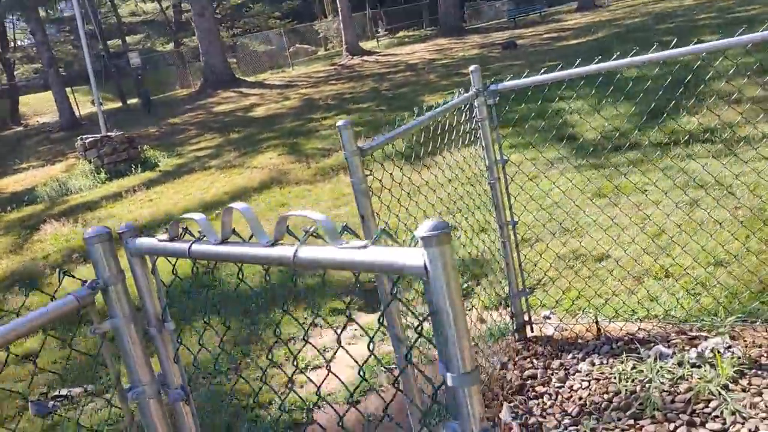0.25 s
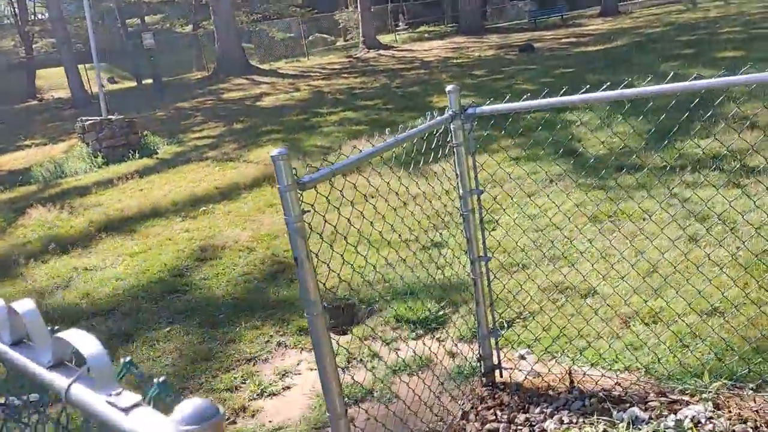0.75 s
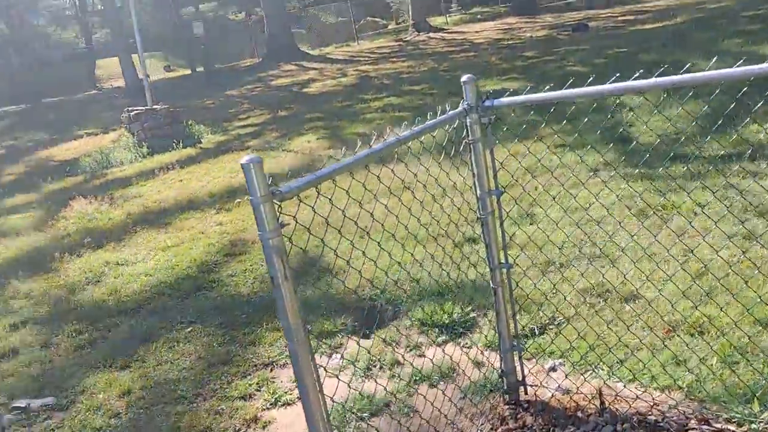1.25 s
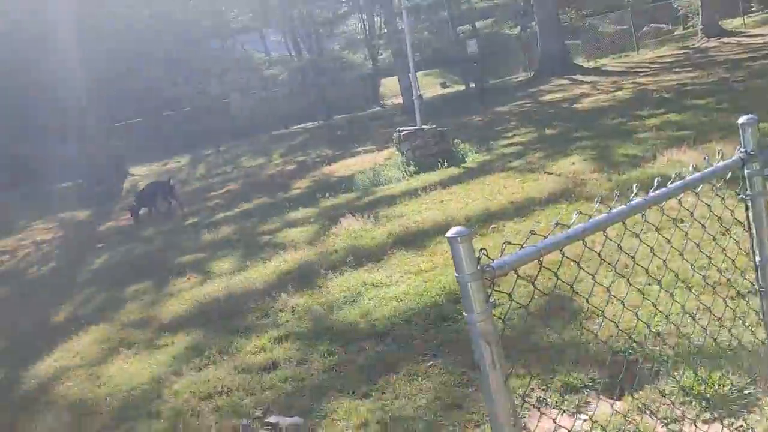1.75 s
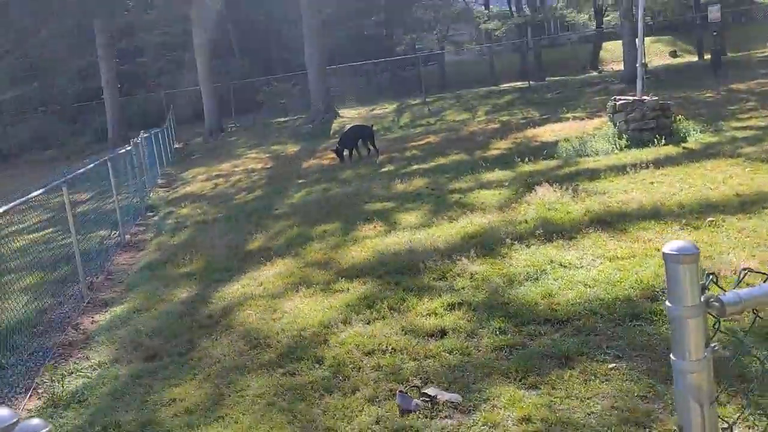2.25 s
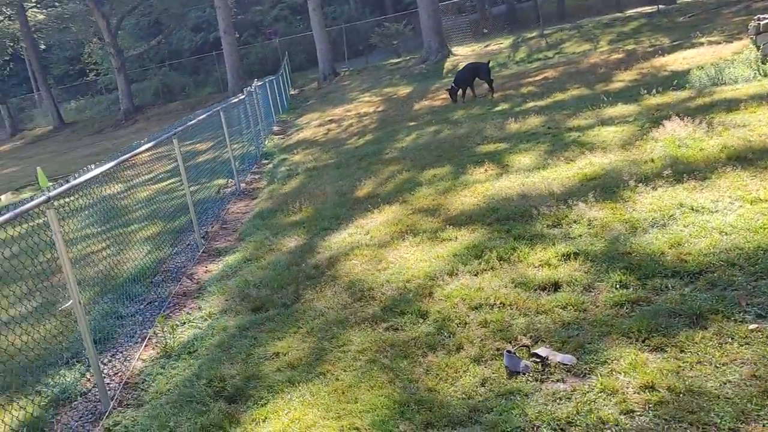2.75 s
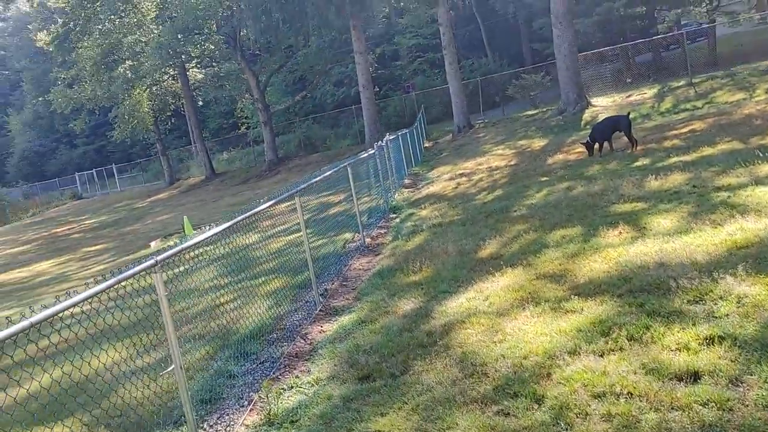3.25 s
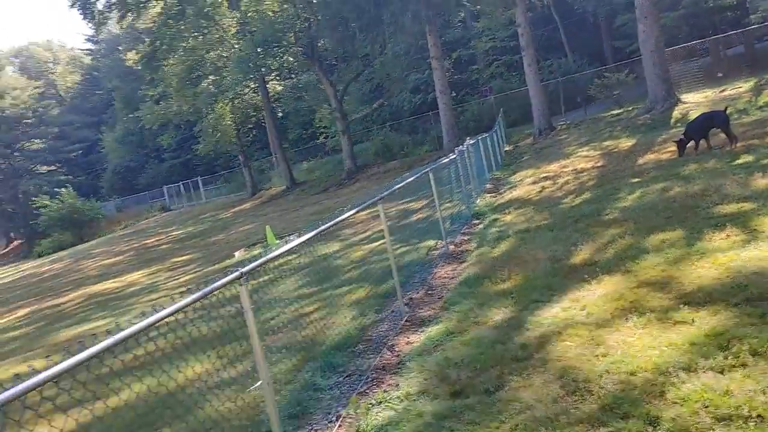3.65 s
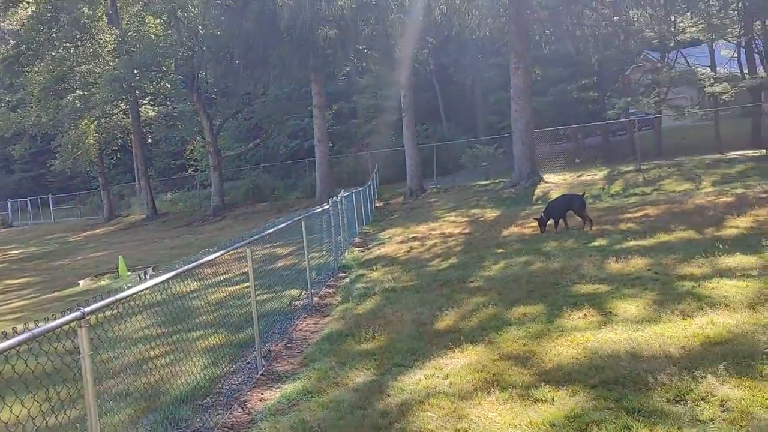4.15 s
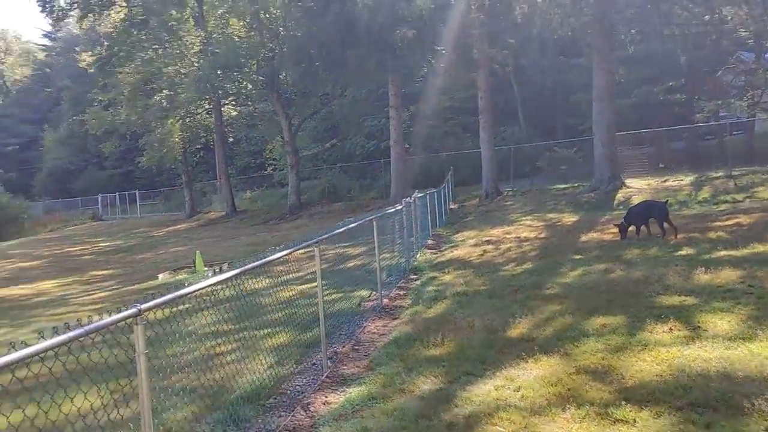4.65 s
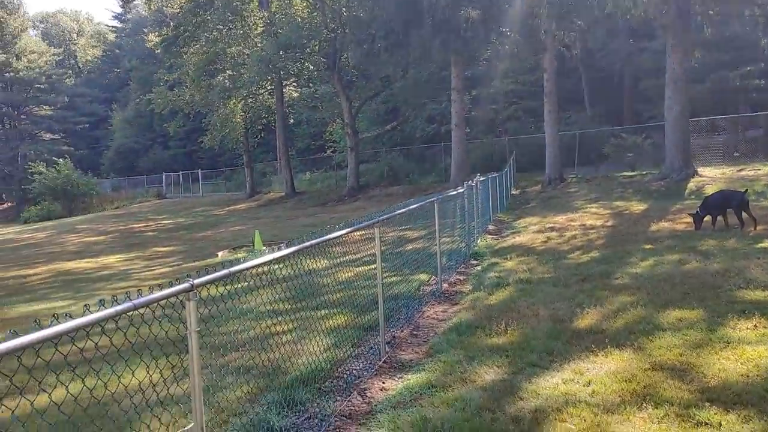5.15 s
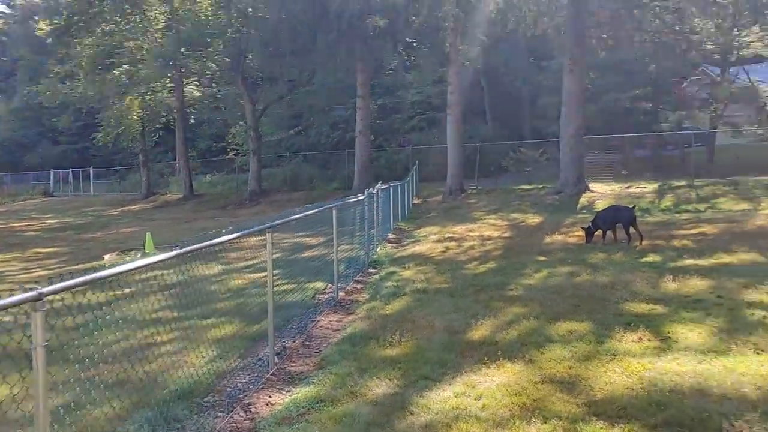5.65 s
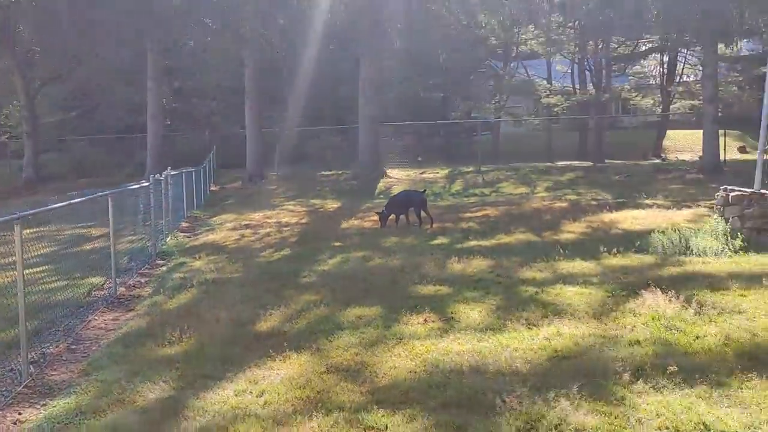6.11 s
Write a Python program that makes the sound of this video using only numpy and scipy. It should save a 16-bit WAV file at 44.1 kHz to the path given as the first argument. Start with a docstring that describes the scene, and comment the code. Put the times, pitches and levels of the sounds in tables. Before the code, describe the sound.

A chain-link gate slams onto its metal post with a ringing clank, then its latch clinks and rattles in a quiet yard.

```python
"""A chain-link gate is swung shut in a quiet back yard: its tube frame clanks on the post and rings, then
the steel fork latch is lifted, dropped and rattled home. Each blow is short coloured noise; frame and fork
add decaying sine modes. The hinge squeaks in wavering sines, loose mesh ticks and chatters in grainy noise,
and feet thud and brush through the grass. Shaped noise makes the rumble and hiss of distant woods, and
late on puffs of wind touch the microphone."""
import sys
import numpy as np
from scipy import signal
from scipy.fft import rfft, irfft, next_fast_len
from scipy.io import wavfile
from scipy.ndimage import uniform_filter1d, map_coordinates

SR = 44100
rng = np.random.default_rng(int(sys.argv[2]) if len(sys.argv) > 2 else 0)


def transcribe(signal):
    """Save signal, clipped to [-1, 1], as a 16-bit WAV file at the path in sys.argv[1]."""
    frames = np.atleast_2d(signal).T
    limited = np.clip(frames, -1, 1)
    pcm = np.round(limited * 32767).astype(np.int16)
    wavfile.write(sys.argv[1], SR, pcm)


N = 281345  # length in samples

# Edges of the four bands of a blow, knock, clank, clink and tick: f/Hz
BAND_EDGES = [250, 900, 3500, 9000, 16000]
LEAD = .02  # time kept before each blow for the noise swell around it (s)


def gate():
    """The tube frame knocks on the post: each contact is a noisy clash plus the long modes of the tubes."""
    # Frame against post: t/s, clank level/dB before trims, hardness (tick over clank)/dB, t60/s, left-right/dB
    gate_hits = [(2.083, -33, -27.5, .06, 0), (2.157, -34, -16.5, 0.14, 1.5),
                 (2.217, -19.5, -14.5, 0.051, 2), (2.251, -21, -16, 0.16, -5.5), (2.261, -10, 0, 0.046, 0),
                 (2.2655, -29, 12.5, 0.18, 9), (2.353, -16.5, -9.5, .076, 2), (2.362, -27.5, -4, 0.048, 14),
                 (2.409, -20.5, -43, 0.06, -6), (2.439, -29, -45, 0.1, 5.5)]
    # Frame tubes: f/Hz, relative level/dB, t60/s
    tube_modes = [(840, -14, 1.0), (894, -18, .8), (1308, -21, .2), (1485, -20, .25), (1600, -17, .28),
                  (1776, -21, .22), (1949, -18, .72), (1992, -13, .33), (2492, -16, .25), (2681, -13, .21),
                  (2935, -18, .2), (3044, -16, .18), (3703, -16, .17), (3930, -20, .42), (4988, -17, .24),
                  (6428, -12, .15), (8820, -3, .09), (10645, -18, .2), (11061, -18, .2), (11209, -15, .3),
                  (13400, -19, .15), (14800, -27, .26)]
    out = np.zeros((2, N))
    for s, db, hardness_db, t60, left_db in gate_hits:
        levels_db = contact(db, hardness_db, thump_db=-18)
        add(out, s - LEAD, amp(-3.5) * panned(left_db) * clash(levels_db, t60))
        add(out, s, amp(-4) * panned(left_db) * ring(tube_modes, levels_db))
    return out


def latch():
    """The steel fork clashes and rings; the balance of its modes depends on where it is struck."""
    # Fork blows: t/s, clank level/dB before trims, hardness (tick over clank)/dB, knock over clank/dB,
    # t60/s, left-right/dB, striking point (0 tip - 1 heel)
    fork_hits = [(2.899, -29.5, -48, -11.5, .06, -3, .05), (3.064, -33, -18.5, -31, .05, 4.5, .05),
                 (3.092, -38.5, 20.5, -25.5, .07, 4, .15), (3.245, -31.5, -17.5, -11.5, 0.13, 1.5, .5),
                 (3.283, -32, -17, 9, .065, -0.5, 0), (3.316, -17.5, 3, -13.5, 0.077, 1, 1),
                 (3.863, -28.5, -25.5, -33.5, .05, -0.5, .12), (3.973, -27.5, -8.5, -12, .05, -3, .4),
                 (4.04, -43, 1.5, -25, .09, -0.5, .18), (4.052, -37.5, -1, -37, .08, 5.5, .3),
                 (4.0707, -31, 16, -31.5, .07, -1, .05), (4.085, -26.5, 9, -34.5, .055, -3.5, .15)]
    # Fork: f/Hz, relative level struck at the tip/dB, relative level struck at the heel/dB, t60/s
    fork_tones = [(620, -20, -1, .08), (1529, -15, -32, .3), (1740, -20, -22, .45), (1860, -24, -19, .38),
                  (1980, -20, -13, .24), (2400, -20, -4, .07), (2990, -14, -2, .07), (3560, -14, -22, .19),
                  (3930, -10, -12, .07), (5730, -22, -10, .1), (6290, -20, -9, .08), (8333, -41, -23, .5),
                  (10030, -8, -26, .14), (10150, -21, -40, .27), (11460, -30, -32, .3),
                  (11397, -15, -12, .08), (13280, -11, -15, .07)]
    out = np.zeros((2, N))
    for s, db, hardness_db, thump_db, t60, left_db, heel in fork_hits:
        levels_db = contact(db, hardness_db, thump_db)
        modes = []
        for hz, tip_db, heel_db, life in fork_tones:
            modes.append((hz, np.interp(heel, [0, 1], [tip_db, heel_db]), life))
        add(out, s - LEAD, panned(left_db) * clash(levels_db, t60))
        add(out, s, amp(-0.5) * panned(left_db) * ring(modes, levels_db))
    return out


def contact(db, hardness_db, thump_db):
    """Levels of knock, clank, clink and tick: a harder contact excites more treble, a cushioned one is dull."""
    clink_db = -1 + 0.48 * hardness_db  # the clink takes about half of the hardness
    return db + np.array([thump_db, 0, clink_db, hardness_db])


def clash(levels_db, t60, attack=0.00099, swell_db=-22, uneven_db=4, spacing_hz=110):
    """Steel on steel: uneven noise dies like crowded short modes; a faint swell lies just before and around."""
    # Colour of the crowded short modes: f/Hz, relative level/dB
    steel_colour = [(250, -9.5), (340, 0), (600, 1), (760, -3.5), (950, -6), (1500, 5.5), (2000, 9.5),
                    (3000, 1), (4600, -11), (6600, -6.5), (7700, -13.5), (9400, -11), (11400, -4.5),
                    (13300, -8.5), (15700, -10)]
    crack_db, crack_s = -8, .002  # the first instant stands out over the decay
    swell_s = 0.0077  # time constant of the noise swell on either side of the blow
    t = np.arange(SR // 6) / SR - LEAD
    strengths = rng.standard_normal(size=400)

    def uneven(hz):
        bumps = np.interp(hz / spacing_hz, np.arange(len(strengths)), strengths)
        return amp(uneven_db * (hz > BAND_EDGES[1]) * bumps)  # the knock band stays even

    crowd = filtered(rush(steel_colour, size=len(t), lag=0.00021), uneven)

    def band(lo, hi):
        return unit(filtered(crowd, lambda hz: 1 / (1 + (lo / (hz + 1)) ** 10) / (1 + (hz / hi) ** 20)))

    body = sum(amp(db) * band(lo, hi) for db, lo, hi in zip(levels_db, BAND_EDGES, BAND_EDGES[1:]))
    after = np.maximum(t, 0)
    blow = np.exp(-np.log(1000) * after / t60) * (1 - np.exp(-after / attack))
    blow = blow * (1 + amp(crack_db) * np.exp(-after / crack_s))
    swell = amp(swell_db) * np.exp(-np.abs(t) / swell_s)
    return body * (blow + swell)


def ring(modes, levels_db):
    """Long sine modes, each driven by the blow in its band; strength and phase differ at each port."""
    size = SR // 2  # time given to each blow to die away
    out = np.zeros((2, size))
    for hz, db, t60 in modes:
        t = np.arange(min(size, int(t60 * SR))) / SR
        drive_db = levels_db[np.searchsorted(BAND_EDGES[1:-1], hz)] + 2 * rng.standard_normal((2, 1))
        phase = rng.uniform(0, 2 * np.pi, (2, 1))
        decay = np.exp(-np.log(1000) * t / t60)
        out[:, :len(t)] += amp(db + drive_db) * decay * np.sin(2 * np.pi * hz * t + phase)
    onset = 1 - np.exp(-np.arange(size) / SR / 0.00043)
    return out * onset


def swing():
    """The hinge squeaks in wavering sines; the shaken mesh chatters as grainy noise and settles to rest."""
    # Hinge squeak: f/Hz, relative level/dB
    squeak_tones = [(2492, -1), (2680, -13), (4985, -8), (11055, -11)]
    # Colour of the shaken mesh: f/Hz, relative level/dB
    shaken_colour = [(250, -23), (650, 0), (1000, -16.5), (1700, 4.5), (2800, 1), (4600, -7), (6700, -3.5),
                     (7800, -15), (9500, -21.5), (11300, -8.5), (13500, -19), (15700, -24)]
    slide_s, slam_s, rest_s = 2.07, 2.261, 2.45  # frame meets post, slams, comes to rest
    t = np.arange(N) / SR
    tones = 0
    for hz, db in squeak_tones:
        strength = amp(db + 2 * wobble(37))
        phase = rng.uniform(0, 2 * np.pi, (2, 1)) + .8 * wobble(60)
        tones = tones + strength * np.sin(2 * np.pi * hz * t + phase)
    chatter = crowded(grainy(shaken_colour, rate=220, depth_db=5), depth_db=6, spacing_hz=70)
    squeak = stroke(2.145, .115, -41.5, attack=0.029, release=.008)
    slide = stroke(slide_s, slam_s - slide_s, -48, attack=0.036, release=.015)
    settling_db = -24 - 80.5 * np.maximum(t - slam_s, 0)  # falls 80.5 dB a second
    slam = stroke(slam_s, rest_s - slam_s, settling_db, attack=.008, release=0.0061)
    return squeak * tones + amp(-1) * (slide + slam) * chatter


def crowded(x, depth_db, spacing_hz):
    """Many narrow wire resonances: random peaks and dips across the spectrum."""
    strengths = rng.standard_normal(size=2000)

    def peaks(hz):
        return amp(depth_db * np.interp(hz / spacing_hz, np.arange(len(strengths)), strengths))

    return unit(filtered(x, peaks))


def mesh():
    """Loose wire and fittings tick without long modes; the longer ticks also start more softly."""
    # Rattles: t/s, clank level/dB before trim, hardness (tick over clank)/dB, t60/s, left-right/dB
    mesh_hits = [(.377, -45, -20, 0.071, -7), (0.771, -50.5, 0.5, .034, -9), (0.805, -61.5, 18, 0.031, -16),
                 (1.2, -43, -23, 0.11, 4), (1.253, -42.5, -9.5, 0.14, 3.5), (1.293, -38, -42, 0.038, 9),
                 (1.304, -40, -43, 0.035, -10), (1.372, -59.5, 14.5, 0.095, -8),
                 (1.508, -36, 0.5, 0.014, 4), (1.549, -43, -16, 0.022, -8),
                 (1.607, -29.5, -38, 0.016, -1.5), (1.645, -38.5, 3.5, 0.026, 11),
                 (3.041, -38, -29, 0.12, -4), (3.554, -42, -4, .06, -4), (3.692, -58, 20, .034, 2.5),
                 (3.723, -56.5, 12, 0.1, -7), (3.985, -34.5, -19, 0.07, -2.5), (4.591, -65, 23.5, .023, -4),
                 (4.723, -58.5, 14, 0.14, 4), (4.823, -48.5, -10.5, 0.055, 6.5),
                 (5.54, -47, -16, 0.067, -17), (5.752, -45.5, -15, 0.19, -4.5)]
    strays = stray_ticks(count=10, db=-50.5, spread_db=2.5, hardness_db=-5.5, t60=.03)
    out = np.zeros((2, N))
    for s, db, hardness_db, t60, left_db in mesh_hits + strays:
        levels_db = contact(db, hardness_db, thump_db=-10)
        add(out, s - LEAD, amp(-1.5) * panned(left_db) * clash(levels_db, t60, attack=t60 / 45))
    return out


def stray_ticks(count, db, spread_db, hardness_db, t60):
    """Rows of faint rattles scattered at random over the whole scene."""
    times = rng.uniform(LEAD, N / SR, count)
    chance = rng.standard_normal((count, 3))
    rows = []
    for s, (a, b, c) in zip(times, chance):
        rows.append((s, db + spread_db * a, hardness_db + spread_db * b, t60, spread_db * c))
    return rows


def rustle():
    """Friction as grainy noise: wire rubs on the frame, the hollow rail is scuffed, feet brush the grass."""
    # Wire rubbing on the frame: t/s, length/s, level/dB before trim
    wire_rubs = [(0.316, 0.11, -62.5), (1.213, 0.38, -66.5), (1.503, .008, -46), (1.545, .12, -55.5),
                 (2.836, 0.12, -60), (3.36, 0.24, -63)]
    # Colour of the rubbed wire: f/Hz, relative level/dB
    wire_colour = [(530, -35.5), (900, -10.5), (1010, -20), (1390, -3), (2840, -4.5), (4330, -1.5),
                   (7540, -14), (9230, -31), (10000, -17), (13000, -43), (22000, -120)]
    # Dull scuffs along the hollow rail: t/s, length/s, level/dB before trim
    rail_scuffs = [(1.247, .018, -45), (1.441, 0.022, -39), (1.894, 0.01, -46), (2.095, .02, -44.5),
                   (3.531, 0.026, -47.5), (4.991, .014, -42), (5.18, .008, -53), (5.364, .008, -51)]
    # Colour of the rail: f/Hz, relative level/dB
    rail_colour = [(300, -21), (1000, -15), (1400, -0.5), (1900, -0.5), (2500, -19), (4000, -31),
                   (8000, -47)]
    # Feet brushing the grass: t/s, length/s, level/dB before trim
    grass_brushes = [(1.227, 0.17, -60), (1.555, 0.022, -52.5), (2.842, .14, -59), (3.541, 0.027, -50.5),
                     (3.685, 0.069, -53.5), (4.523, 0.012, -60), (4.664, 0.032, -47), (4.965, .035, -61.5),
                     (5.739, 0.028, -48)]
    # Colour of the grass: f/Hz, relative level/dB
    grass_colour = [(2940, -42), (5000, -12), (6050, -23.5), (6760, -1.5), (10300, -9.5), (12000, 2.5),
                    (14200, -2), (16000, -27)]
    rubs = sum(stroke(*row, attack=0.0081, release=0.016) for row in wire_rubs)
    scuffs = sum(stroke(*row, attack=0.0049, release=0.016) for row in rail_scuffs)
    brushes = sum(stroke(*row, attack=0.007, release=0.035) for row in grass_brushes)
    wire = amp(3.5) * rubs * grainy(wire_colour, rate=200, depth_db=5.5)
    rail = amp(-1.5) * scuffs * grainy(rail_colour, rate=260, depth_db=2.5) * panned(-4.5)
    grass = amp(-0.5) * brushes * grainy(grass_colour, rate=350, depth_db=5.5)
    return wire + rail + grass


def steps():
    """Soft footfalls on turf: dull noise thuds with a quick start and decay."""
    # Footfalls: t/s, level/dB before trim
    footfalls = [(0.375, -39), (0.42, -44.5), (1.182, -37), (1.2, -38), (1.228, -38), (1.488, -40.5),
                 (2.001, -43), (2.127, -40), (2.852, -41), (2.875, -41.5), (3.579, -40), (4.53, -39),
                 (5.095, -41.5), (5.184, -46), (5.369, -44.5)]
    # Colour of a thud: f/Hz, relative level/dB
    thud_colour = [(71, -41), (120, -15.5), (437, 6), (955, -15), (1230, -14), (1750, -7.5), (2350, -49.5),
                   (3000, -14), (3900, -72), (6600, -120)]
    out, t = np.zeros((2, N)), np.arange(SR // 4) / SR
    thud = np.exp(-t / 0.016) * (1 - np.exp(-t / 0.00042))
    for s, db in footfalls:
        add(out, s, amp(db + 0.5) * thud * rush(thud_colour, size=len(t)))
    return out


def wind():
    """Puffs of fluttering low noise, mostly on the right port, which lags the left by 15 ms."""
    # Puffs: t/s, length/s, level/dB before trim
    puff_rows = [(4.92, .02, -50.5), (5.512, 0.057, -46.5), (5.652, .02, -49), (5.73, 0.065, -44),
                 (5.811, .21, -39.5), (6.333, 0.034, -48)]
    # Colour of the buffeting: f/Hz, relative level/dB
    buffet_colour = [(12, -42.5), (20, -7), (49, 3), (103, 2), (163, -5), (214, -34.5), (350, -29.5),
                     (460, -58), (770, -120)]
    flutter = amp(3.5 * wobble(40))
    lumps = rush(buffet_colour, lag=0.015) * flutter
    puffs = sum(stroke(*row, attack=0.0086, release=0.025) for row in puff_rows)
    return amp(-5.5) * puffs * unit(lumps) * panned(-18)


def air():
    """Shaped noise: a wavering far-off rumble, and a hiss of woods and leaves that flickers in patches."""
    # Low rumble of the surroundings: t/s, level/dB before trim
    rumble_level = [(0.0, -59), (1.72, -58.5), (2.27, -63.5), (2.49, -62.5), (6.38, -61)]
    # Colour of the rumble: f/Hz, relative level/dB
    rumble_colour = [(15, -51), (25, -22), (102, -2.5), (169, -8.5), (284, -4.5), (412, -5.5), (762, -8.5),
                     (854, -13.5), (1050, -18), (1200, -16.5), (1560, -51.5), (2640, -120)]
    # Hiss of the woods: t/s, level/dB before trim
    woods_level = [(0.0, -65.5), (0.8, -64.5), (2.04, -54.5), (2.33, -53.5), (2.61, -61.5), (3.36, -56),
                   (4.1, -59.5), (6.38, -58)]
    # Colour of the woods: f/Hz, relative level/dB
    woods_colour = [(410, -29.5), (700, -5), (852, -13.5), (934, -14), (1260, -7.5), (1820, 2.5),
                    (2240, -10), (3240, -18), (4260, -16), (4920, -23), (5690, -24.5), (8100, -27.5),
                    (12500, -25), (16000, -28)]
    # A brighter hiss that fades out early: t/s, level/dB before panning and flicker
    leaves_level = [(0, -55.5), (1.6, -59.5), (2.2, -74)]
    # Colour of the brighter hiss: f/Hz, relative level/dB
    leaves_colour = [(1200, -26), (2000, 4), (2800, 2), (3300, -7.5), (4500, -14.5), (7000, -20.5),
                     (12000, -16)]
    waver = amp(.9 * wobble(9))
    low = amp(5) * waver * level(rumble_level) * rush(rumble_colour) * panned(.4)
    woods = amp(3.5) * level(woods_level) * rush(woods_colour)
    leaves = level(leaves_level) * rush(leaves_colour) * panned(1.7)
    z = signal.stft(woods + leaves, nperseg=512)[2]
    # Smooth random gains over frequency, then time
    patches = uniform_filter1d(rng.standard_normal(z.shape[1:]), size=4, axis=0)
    patches = unit(uniform_filter1d(patches, size=10, axis=1))
    return low + signal.istft(z * amp(1.7 * patches), nperseg=512)[1][:, :N]


def yard(x):
    """Scatter from fence, house and trees: a noise tail in which each frequency dies at its own speed."""
    # Decay of the yard: f/Hz, t60/s
    yard_decay = [(300, .4), (1800, 0.27), (5000, 0.14), (13000, 0.49)]
    hz, t, z = signal.stft(rng.standard_normal((2, SR)), SR, nperseg=256)
    decay = np.exp(-np.log(1000) * t / along(yard_decay, hz)[:, None])
    tail = signal.istft(z * decay, SR, nperseg=256)[1]
    return signal.fftconvolve(x, tail / np.linalg.norm(tail[0]), axes=1)[:, :N]


def rush(spectrum, size=N, lag=.00048):
    """Coloured stereo noise of rms 1, most alike in the bass, reaching the right port lag seconds later."""
    # Likeness of the two ports: f/Hz, left-right correlation (0-1)
    likeness = [(60, 0.67), (200, 1), (500, 0.59), (900, .45), (1700, 0.32), (3000, 0.35), (5000, 0.084),
                (15000, 0.053)]
    m = next_fast_len(size, real=True)
    hz = np.fft.rfftfreq(m, 1 / SR)
    turn = np.arccos(np.clip(along(likeness, hz), 0, 1)) / 2
    coloured = rfft(rng.standard_normal((2, m))) * amp(along(spectrum, hz))
    mid, side = coloured * [np.cos(turn), np.sin(turn)]
    delay = np.exp(-2j * np.pi * hz * lag)
    return unit(irfft(np.array([mid + side, (mid - side) * delay]), m)[:, :size])


def grainy(spectrum, rate, depth_db):
    """Noise of rms 1 broken into quick uneven grains."""
    return unit(rush(spectrum) * amp(depth_db * wobble(rate)))


def stroke(s, length, db, attack, release):
    """Gain per sample of one gesture: it rises, holds until its length is up and dies away."""
    gain = np.zeros(N)
    during = np.arange(round(s * SR), min(N, round((s + length + 10 * release) * SR)))
    t = during / SR - s
    gain[during] = np.clip(t / attack, 0, 1) * np.exp(-np.maximum(t - length, 0) / release)
    return amp(db) * gain


def level(rows):
    """Gain per sample from (s, dB) rows; practically silent outside them."""
    s, db = np.transpose(rows)
    return amp(np.interp(np.arange(N) / SR, s, db, left=-120, right=-120))


def wobble(rate):
    """A smooth random curve, rate knots a second."""
    knots = rng.standard_normal(int(N * rate / SR) + 4)
    fine = np.arange(0, len(knots), .1)
    return np.interp(np.arange(N) * rate / SR, fine, map_coordinates(knots, [fine]))


def filtered(x, response):
    """Multiply the spectrum of x by a response of frequency."""
    n = x.shape[-1]
    m = next_fast_len(n + n // 20, real=True)
    return irfft(rfft(x, m) * response(np.fft.rfftfreq(m, 1 / SR)), m)[..., :n]


def along(points, hz):
    """Read (Hz, value) points on a log frequency axis."""
    f, v = np.transpose(points)
    return np.interp(np.log(hz + 1), np.log(f + 1), v)


def amp(db):
    """Decibels to gain."""
    return np.exp(np.asarray(db) * np.log(10) / 20)


def unit(x):
    """Scale to rms 1."""
    return x / np.sqrt(np.mean(x ** 2) + 1e-20)


def panned(left_db):
    """Gains of the two channels, left_db apart."""
    return amp([[left_db / 2], [-left_db / 2]])


def add(track, s, sound):
    """Mix a sound in at time s."""
    part = track[:, round(s * SR):][:, :sound.shape[-1]]
    part += sound[..., :part.shape[-1]]


def scene():
    """Steel close by with its faint scatter, in the open air."""
    # Stereo place of gate and fork, lows to the left and upper mids to the right: f/Hz, left-right/dB
    steel_side = [(700, 3), (2000, -3), (3000, -7.5), (5000, -5), (7000, 0)]
    near = gate() + swing() + latch()
    near = filtered(near, lambda hz: amp(np.outer([.5, -.5], along(steel_side, hz))))
    steel = near + mesh()
    scatter_colour = [(400, -38.5), (1800, -29.0), (5000, -9), (12000, -34.5)]  # f/Hz, gain/dB
    scatter = filtered(yard(steel), lambda hz: amp(along(scatter_colour, hz)))
    return steel + scatter + steps() + rustle() + air() + wind()


def record(dry):
    """Each microphone port has its own colour; a steep low-pass removes the top treble."""
    # Colour of the left port: f/Hz, gain/dB
    left_colour = [(500, -2.5), (1300, 1), (1900, -3.5), (3000, 4.5), (6500, 3.5), (8000, -1), (10000, 2.5),
                   (12000, -4), (16000, -2)]
    # Colour of the right port: f/Hz, gain/dB
    right_colour = [(500, -2), (1300, 5.5), (1900, 0), (3000, -3.5), (5500, -2), (7600, -27), (10000, 0),
                    (12000, 6), (16000, 1.5)]
    top_hz = 15900
    heard = filtered(dry, lambda hz: amp([along(left_colour, hz), along(right_colour, hz)]))
    return filtered(heard, lambda hz: 1 / (1 + (hz / top_hz) ** 120))


dry = scene()
out = record(dry)
transcribe(out)
```